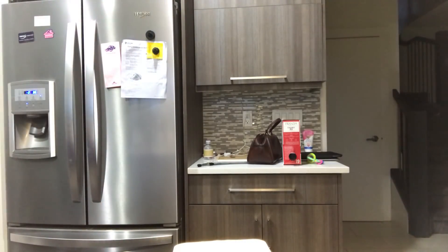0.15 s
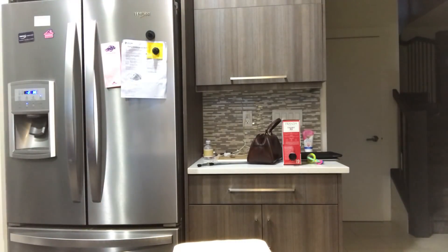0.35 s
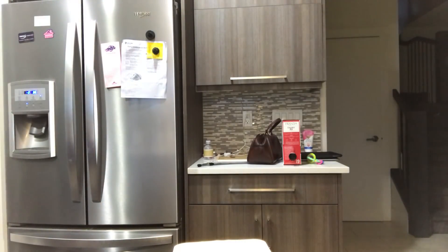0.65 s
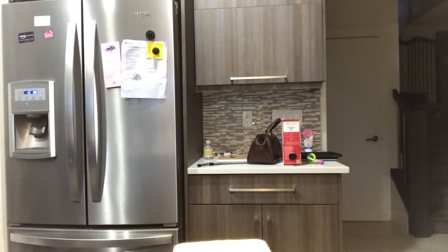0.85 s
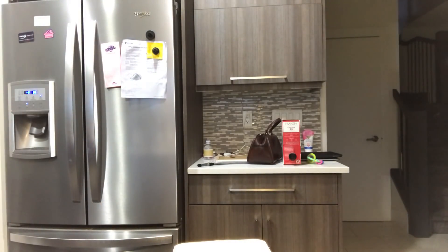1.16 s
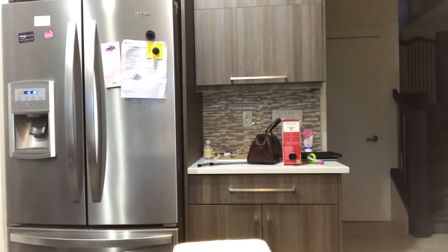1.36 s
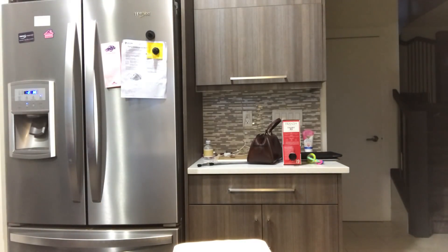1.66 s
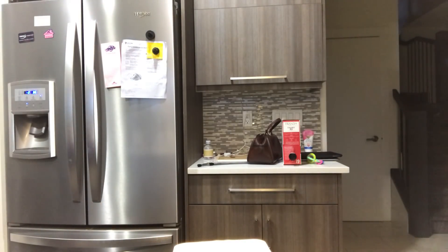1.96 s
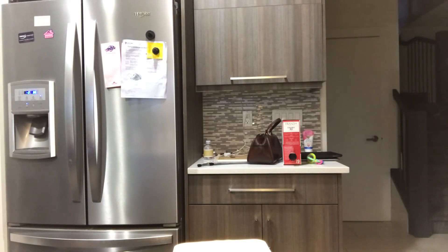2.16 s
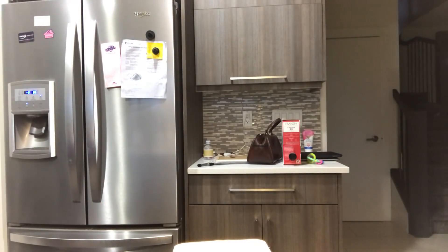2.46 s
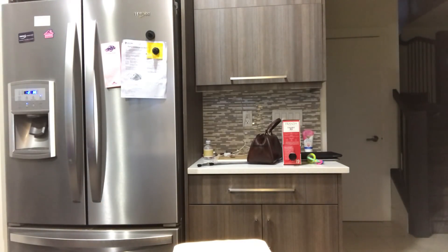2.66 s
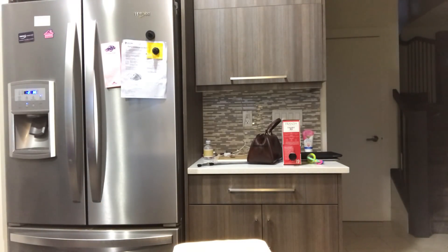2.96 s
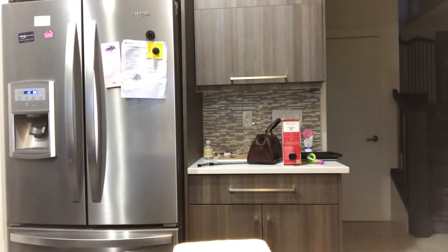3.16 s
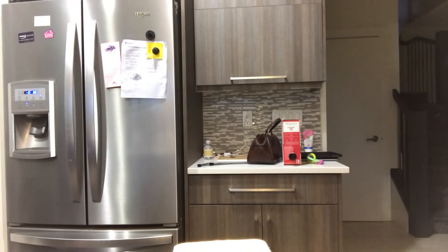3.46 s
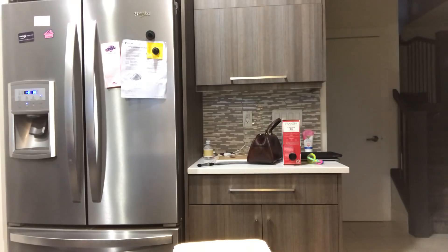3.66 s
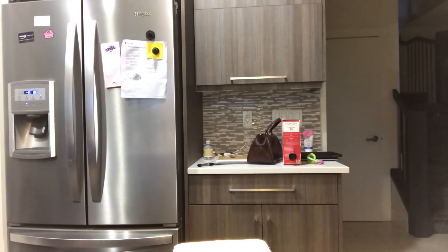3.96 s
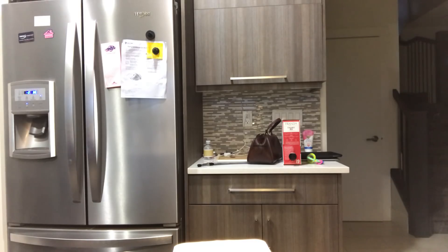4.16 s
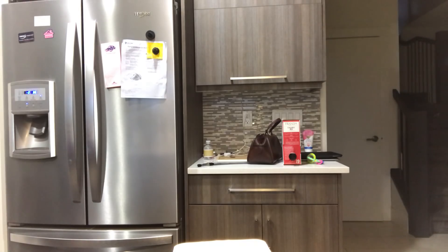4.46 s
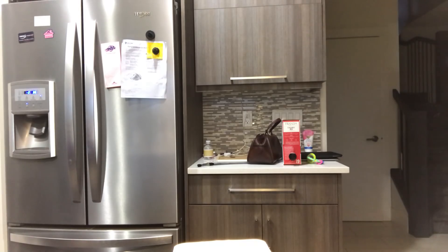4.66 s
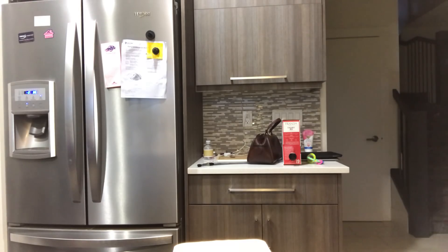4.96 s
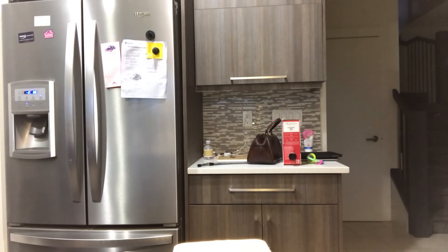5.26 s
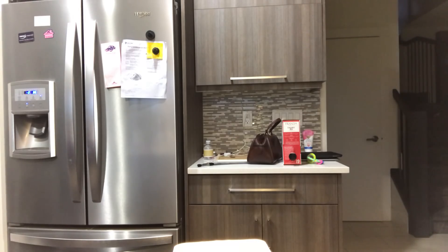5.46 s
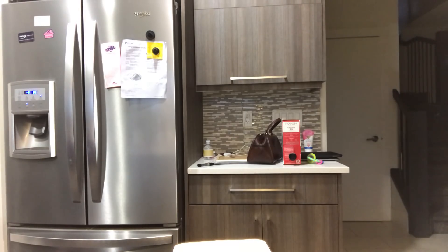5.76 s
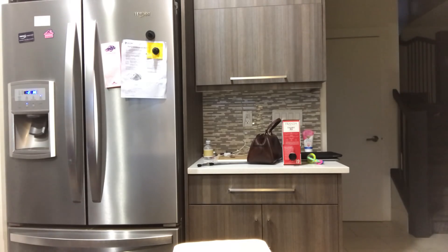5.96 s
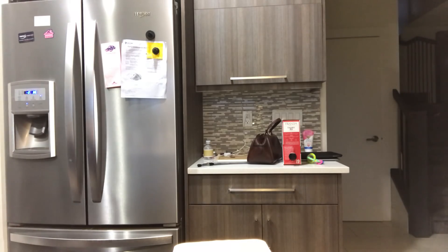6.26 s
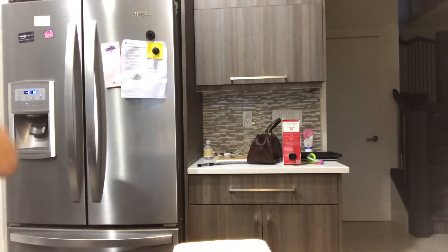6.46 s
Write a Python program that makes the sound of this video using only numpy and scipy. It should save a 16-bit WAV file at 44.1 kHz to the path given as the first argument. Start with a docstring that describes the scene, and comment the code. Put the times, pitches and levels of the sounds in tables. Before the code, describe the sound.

Small clicks and a low wooden rumble lead to a firm double-edged bump with a deep boom as a drawer reaches its stop. Spoons, forks and knives then tick and clack against each other and a hollow tray, growing busier and louder until pieces are dropped back. A softer roll and dull closing boom follow, with fabric rustling. Reverberant indoor kitchen, quiet fridge hum, single mono microphone.

```python
"""A drawer knocks and rumbles out to its stop, then steel cutlery clinks and jangles in a tray.
Each contact ticks, rings damped steel modes, clacks the handles and knocks the tray, all as struck resonators.
Rolls, fridge air and the clothes rustling at the end are shaped noise; the fridge hum is a few wavering sines.
Blows and slips sound through a hard-walled kitchen of early reflections and a diffuse tail."""
import sys
import numpy as np
from scipy import signal
from scipy.fft import rfft, irfft, next_fast_len
from scipy.io import wavfile
from scipy.ndimage import map_coordinates

SR = 44100
rng = np.random.default_rng(int(sys.argv[2]) if len(sys.argv) > 2 else 0)


def wav_out(sig):
    """Save sig, one row per channel (or a flat mono array), as 16-bit PCM at SR to the path in sys.argv[1]."""
    wavfile.write(sys.argv[1], SR, np.round(np.clip(np.atleast_2d(sig).T, -1, 1) * 32767).astype(np.int16))


N = 291746
TIME = np.arange(N) / SR
TAIL = np.arange(2 ** 15) / SR  # time axis in seconds of one struck sound with its decay
BRIEF = TAIL[:2 ** 12]  # time axis in seconds of the shortest details
TOP_HZ = 15950  # upper band limit

# Modes of a fork, rung singly and by pushed pieces.
# Each row: frequency in Hz before detuning, level in dB before scatter, t60 in seconds before damping.
FORK_MODES = [(4170, -6, .3), (4931, -7, .25), (5300, -6, .3), (6820, -7, .25), (7230, -7, .2),
              (7880, -6, .7), (7985, -9, .8), (9445, -2, .25), (9480, -6, .2), (11164, -7, .3),
              (11611, -1, .5), (11670, -4, .2), (12735, -3, .2), (13820, -1, .2), (14090, -5, .25),
              (14670, 0, .2), (15590, -2, .25)]
# Colours of the steel tick, the handle clack and the tray knock. Each row: frequency in Hz, level in dB.
TICK_COLOUR = [(500, -28), (2000, -9), (4000, 3.5), (5200, -1.5), (6200, 0), (7300, -0.5), (9500, 0.5),
               (10400, -8.5), (11500, -2), (14000, 0.5), (15700, 0)]
HANDLE_COLOUR = [(400, -24.5), (1000, -3.5), (1600, 1.5), (2500, 1.5), (2900, -3.5), (3500, -3),
                 (4300, -4.5), (5500, -8.5), (9000, -21.5), (15000, -33)]
TRAY_COLOUR = [(120, -27.5), (230, -3.5), (400, -6), (700, 0.5), (1250, 0.5), (1800, -7.5), (3000, -21),
               (7000, -37), (15000, -48)]
# Hollow resonances of tray and drawer. Each row: frequency in Hz, width in Hz, peak in dB over the colour.
BOX_RESONANCES = [(242, 16, 7), (358, 20, 3), (478, 30, 2), (589, 30, 2), (711, 28, 6), (1058, 35, 4),
                  (1245, 35, 4), (1470, 40, 3), (2310, 70, 2)]


def amp(db):
    """Decibels to gain."""
    return 10 ** (np.asarray(db) / 20)


def unit(x):
    """Scaled to rms 1."""
    return x / np.sqrt(np.mean(x ** 2) + 1e-20)


def along(points, hz):
    """(Hz, value) points read on a log frequency axis."""
    f, v = np.transpose(points)
    return np.interp(np.log(hz + 1), np.log(f + 1), v)


def swell(strokes, attack_s, release_s):
    """Gain per sample of (start s, length s, dB) strokes: each sets in, holds and dies away."""
    gain = np.zeros(N)
    for start, length, db in strokes:
        t = TIME - start
        attack = np.clip(t / attack_s, 0, 1)
        release = np.exp(-np.maximum(t - length, 0) / release_s)
        gain += amp(db) * attack * release
    return gain


def add(bus, s, x):
    """Mix x into the bus at time s in seconds."""
    part = bus[max(round(s * SR), 0):][:len(x)]
    part += x[:len(part)]


def through(x, response):
    """x played through an impulse response, at its own length."""
    return signal.fftconvolve(x, response)[:len(x)]


def body(colour, resonances=(), size=8192):
    """Minimum-phase impulse response of energy 1 with a broad colour and resonant peaks."""
    hz = np.fft.rfftfreq(size, 1 / SR)
    db = along(colour, hz)
    for f, width, peak in resonances:
        db = db + peak / (1 + (2 * (hz - f) / width) ** 2)
    # folding the cepstrum forward in time makes the response causal
    cepstrum = irfft(np.log(amp(db)))
    cepstrum[1:size // 2] *= 2
    cepstrum[size // 2 + 1:] = 0
    response = irfft(np.exp(rfft(cepstrum)))
    return response / np.linalg.norm(response)


def noise(colour):
    """Coloured noise of rms 1."""
    return unit(through(rng.standard_normal(N), body(colour)))


def kitchen(direct_db=-8, early_db=-2, early_s=0.0079, build_s=0.0042):
    """The room's answer, drawn anew per call: direct sound, a cluster off counter and cupboards, a diffuse tail."""
    # Reverberation time of the tail. Each row: frequency in Hz, t60 in seconds.
    decay_times = [(100, 0.79), (400, 0.56), (1200, 0.72), (4000, 0.65), (8000, 0.55), (15000, 0.39)]
    hz, t, z = signal.stft(rng.standard_normal(len(TAIL)), SR, nperseg=256)
    decay = amp(-60 * t / along(decay_times, hz)[:, None])
    tail = signal.istft(z * decay, SR, nperseg=256)[1][:len(TAIL)]
    tail *= 1 - np.exp(-TAIL / build_s)
    early = rng.standard_normal(len(TAIL)) * np.exp(-((TAIL - early_s) / .004) ** 2)
    response = tail / np.linalg.norm(tail)
    response += amp(early_db) * early / np.linalg.norm(early)
    response[0] += amp(direct_db)
    return response


def chatter(length_s, bounce_db, per_s=900):
    """A first blow and its quick, random, dying bounces, of energy 1."""
    blows = (rng.random(len(BRIEF)) < per_s / SR) * rng.standard_normal(len(BRIEF))
    blows *= amp(bounce_db) * np.exp(-BRIEF / max(length_s, 1e-3))
    blows[0] = 1
    return blows / np.linalg.norm(blows)


def strike(response, length_s, bounce_db):
    """A chattering blow on a body, padded to the length of TAIL."""
    sound = signal.fftconvolve(chatter(length_s, bounce_db), response)
    return np.pad(sound, (0, len(TAIL) - len(sound)))


def bounces(first, step, count):
    """Rows of a blow and its repeats, each one step on from the last."""
    return [np.add(first, k * np.array(step)) for k in range(count)]


def ring(modes, detune=0.0039, damping=0.17, scatter_db=5.5, count=3, size=128):
    """Damped sines of like pieces of steel, each a little out of tune and its t60 scaled by damping; energy 1."""
    hz, db, t60 = np.tile(np.transpose(modes), count)
    hz = hz * (1 + detune * rng.standard_normal(len(hz)))
    level = amp(db + scatter_db * rng.standard_normal(len(hz)))
    strength = level * np.exp(2j * np.pi * rng.random(len(hz)))
    poles = 2j * np.pi * hz - np.log(1000) / (t60 * damping)
    # each damped sine: its state at the start of a block times its course within the block
    block_starts = strength * np.exp(np.outer(TAIL[::size], poles))
    within_block = np.exp(np.outer(poles, TAIL[:size]))
    tone = (block_starts @ within_block).imag.ravel()
    return tone / np.linalg.norm(tone)


def heap(t60, lo_hz, hi_hz, count=16):
    """The other pieces, lying on each other, answer every blow with different brief modes; energy 1."""
    hz = rng.uniform(lo_hz, hi_hz, (count, 1))
    modes = np.sin(2 * np.pi * (hz * BRIEF + rng.random((count, 1))))
    tone = modes.sum(axis=0) * amp(-60 * BRIEF / t60)
    return tone / np.linalg.norm(tone)


def background(air_db=-61.5, hum_db=-1, waver=0.21, waver_rate=6):
    """The fridge's hum, sines with slowly drifting phase, over the quiet rush of the room."""
    # Colour of the room's rush. Each row: frequency in Hz, level in dB.
    air_colour = [(12, -52), (20, -28), (48, -7), (134, -0.5), (158, -3), (241, -4), (262, -2.5),
                  (285, -3.5), (319, -5), (347, -2), (377, -9.5), (607, -8.5), (1330, -20), (4420, -26),
                  (16000, -38)]
    # Partials of the fridge. Each row: frequency in Hz, rms level in dB before the hum trim.
    hum_partials = [(59.2, -66), (188.4, -70), (236.9, -67), (296.1, -70.5), (398.4, -70.5)]
    out = amp(air_db) * noise(air_colour)
    for hz, db in hum_partials:
        drift = map_coordinates(rng.standard_normal(200), [TIME * waver_rate], mode="mirror")
        out += amp(db + hum_db) * unit(np.sin(2 * np.pi * hz * TIME + waver * drift))
    return out


def clothes(level_db=-1):
    """Soft swishes of fabric: coloured noise that swells and dies away."""
    # Swishes of clothing. Each row: start in seconds, length in seconds before the release, level in dB before trim.
    swishes = [(6.11, .07, -66), (6.185, 0.055, -60.5), (6.485, 0.058, -55)]
    # Colour of the fabric. Each row: frequency in Hz, level in dB.
    cloth_colour = [(600, -16.5), (1800, -1), (2700, -2), (3250, 2.5), (4200, -4), (6500, -2),
                    (10000, -13.5), (15000, -12)]
    return amp(level_db) * swell(swishes, attack_s=0.053, release_s=0.13) * noise(cloth_colour)


def drawer(click_db=30, rail_db=15, wood_db=30, roll_db=-1):
    """The drawer rumbles along its runners and bumps its stop; clicks, ringing rails and wood boom on each blow."""
    # The drawer runs out, then back. Each row: start in seconds, length in seconds before the release,
    # level in dB before trim.
    rolls = [(.5, 0.5, -56), (5.5, 0.67, -62)]
    # Light knocks as the drawer is gripped and runs. Each row: start in seconds, runner click in dB,
    # wood in dB, extra rail ring in dB, all levels before trim.
    bumps = [(0.043, -56.5, -64, 8.5), (0.089, -53.5, -56.5, 8), (0.173, -60, -61.5, -13),
             (0.465, -51.5, -56.5, -8), (0.712, -64, -58, 0), (1.103, -63, -53.5, 2), (1.386, -52, -52, 0),
             (1.785, -61.5, -60, -9)]
    # The blow at the stop, in one row: runner click in dB, wood in dB, extra rail ring in dB, before trim.
    stop_levels = (-35.5, -34.5, 3)
    # Booms of the woodwork: the front when pulled, the cabinet at the stop and on closing.
    # Each row: start in seconds, frequency in Hz, level in dB before rise and decay, t60 in seconds,
    # rise time constant in seconds.
    shudders = [(.09, 349, -43, 0.18, 0.0019), (0.092, 510, -49.5, 0.28, 0.0035),
                (1.41, 37, -34.5, 0.5, 0.038), (1.406, 95.5, -41.5, 0.48, 0.033),
                (1.407, 127.3, -40, 0.097, 0.013), (1.407, 240, -37, 0.28, 0.016),
                (6.1, 143.5, -50, 0.37, 0.029)]
    # A gentle blow is a soft, dull one. Each row: runner click in dB before trim, low-pass edge in Hz
    # before the cap at TOP_HZ.
    hardness = [(-38, 5200), (-35, 20000)]
    # Modes of the steel runners. Each row: frequency in Hz before detuning, level in dB before scatter,
    # t60 in seconds before damping.
    rail_modes = [(3536, -7, 1.5), (4010, -7, .2), (4290, -5, .2), (4700, -6, .15), (4990, -7, .2),
                  (5560, -15, 1.2), (5819, -6, .2), (6637, -6, .2), (7778, -7, .2), (8720, -9, .2),
                  (11574, -10, .2), (15423, -13, .2)]
    # Colours of the rolling, the runner click and the wood. Each row: frequency in Hz, level in dB.
    rumble_colour = [(88, -31), (150, -7.5), (299, -4.5), (651, -8), (710, -7.5), (1660, -21),
                     (2010, -27.5), (5000, -38.5), (6500, -64.5), (11000, -120)]
    runner_colour = [(400, -23.5), (1500, 8), (2400, 8.5), (4200, 4.5), (5300, 2), (6800, 3), (10400, -5.5),
                     (11600, -1), (15500, -2)]
    wood_colour = [(50, -22), (130, 1), (240, 4), (500, 8.5), (1000, 4), (2000, 0.5), (2800, -8),
                   (5000, -37), (15000, -60)]

    out = amp(roll_db) * swell(rolls, attack_s=0.11, release_s=0.16) * noise(rumble_colour)
    runner, wood = body(runner_colour), body(wood_colour, BOX_RESONANCES)
    # against its stop the drawer rebounds: seconds on, click and wood lower in dB, same extra ring
    stop_s, rebound = 1.395, (.021, -4, -3, 0)
    for s, click, thud, free in [*bumps, *bounces((stop_s, *stop_levels), rebound, count=3)]:
        blow = amp(click + click_db) * strike(runner, 0.0037, bounce_db=-4.5)
        blow += amp(click + rail_db + free) * ring(rail_modes, detune=0.0012, damping=0.82, count=1)
        blow += amp(thud + wood_db) * strike(wood, 0.0041, bounce_db=4)
        edge_hz = min(np.interp(click, *np.transpose(hardness)), TOP_HZ)
        softened = signal.lfilter(*signal.butter(1, edge_hz, fs=SR), blow)
        add(out, s, through(softened, kitchen()))
    for s, hz, db, t60, rise_s in shudders:
        envelope = amp(db - 60 * TAIL / t60) * (1 - np.exp(-TAIL / rise_s))
        add(out, s, envelope * np.sin(2 * np.pi * hz * TAIL))
    return out


def jostle(tray_db=-15, handle_db=-13, steel_db=-14, ring_db=-21, per_s=140):
    """Pushed pieces slip over each other in many small random contacts, each exciting steel, handle and tray."""
    # The hand pushes through the heap. Each row: start in seconds, length in seconds before the release,
    # level in dB of the slips before the contact levels.
    pushes = [(3.89, 0.24, -35.5), (4.36, .25, -32.5)]
    effort = swell(pushes, attack_s=0.025, release_s=0.031)
    slips = unit((rng.random(N) < per_s / SR) * rng.standard_normal(N)) * effort
    contact = amp(ring_db) * ring(FORK_MODES)
    knock = amp(tray_db) * body(TRAY_COLOUR, BOX_RESONANCES)
    knock += amp(handle_db) * body(HANDLE_COLOUR)
    knock += amp(steel_db) * body(TICK_COLOUR)
    add(contact, 0, knock)
    return through(slips, through(kitchen(), contact))


def cutlery(tick_db=30, heap_db=24, ring_db=23, clack_db=28, handle_ring_db=18, knock_db=30, tray_lag_s=0.00305):
    """Steel meets steel and rings, the handles clack, and a moment later the tray takes the blow."""
    # Cutlery picked up and knocked about. Each row: start in seconds, steel tick in dB, handle clack in dB,
    # tray knock in dB, extra ring in dB, all levels before trim.
    clinks = [(2.246, -78, -63, -54.5, -10), (2.290, -76, -58.5, -54.5, 0), (2.349, -60, -55.5, -70, -10),
              (2.571, -52, -55.5, -56.5, -9), (2.635, -46, -50.5, -47.5, -1), (2.668, -49.5, -48, -53, -3),
              (2.694, -56, -53.5, -49.5, 9), (2.763, -47.5, -40.5, -52, 11), (2.899, -74, -39, -38.5, -8),
              (2.963, -77, -62, -54, -3), (3.618, -73, -59, -57, -1), (3.646, -53, -53.5, -54.5, -10),
              (3.662, -53.5, -44, -54, -13), (3.702, -50.5, -48, -52, -15), (3.786, -49, -42.5, -46, 14),
              (3.881, -37.5, -43.5, -42, -0.5), (3.943, -49.5, -36, -43, -8), (3.998, -42, -40, -40.5, -8),
              (4.049, -43.5, -35.5, -39, -9), (4.099, -44.5, -32, -43, -17),
              (4.191, -46.5, -50, -44.5, -12), (4.266, -51, -56, -54, -3), (4.326, -45.5, -43.5, -47, -8),
              (4.341, -38.5, -38, -40, 3), (4.454, -35, -37, -38.5, -1), (4.513, -50, -36, -38, 3),
              (4.903, -39.5, -44.5, -43.5, 2.5), (5.206, -81, -59, -54, 0)]
    # Handfuls dropped back into the tray, each tumbling a few times before it lies still.
    # Each row: start in seconds, steel tick in dB, handle clack in dB, tray knock in dB, extra ring in dB.
    drops = [(4.597, -36.5, -39, -40.5, 10.3), (5.224, -30, -36.5, -35, 3)]
    # A piece landing on its handle stops dead, steel on steel chatters.
    # Each row: steel tick over handle clack in dB before trim, time constant of the chatter in seconds.
    chatter_lengths = [(-13, 0.0028), (3, 0.0086)]
    # Modes of a spoon and a knife. Each row: frequency in Hz before detuning, level in dB before scatter,
    # t60 in seconds before damping.
    spoon_modes = [(1060, -3, .15), (2314, -5, .15), (2500, -6, .15), (3480, -7, .2), (4000, -7, .35),
                   (5291, -6, .25), (7009, -1, .45), (9140, -7, 1.2), (9496, -7, .3), (11595, -3, .25),
                   (12763, 0, .25), (13813, -5, .35), (14730, 0, .2), (14950, -3, .2), (15595, -3, .35)]
    knife_modes = [(2306, -4, .4), (3950, -3, .3), (4376, -5, .5), (5040, -5, .35), (5280, -5, .35),
                   (7440, -5, .4), (7902, -3, .3), (9108, -4, .3), (9463, -6, .3), (11470, -1, .3),
                   (11600, -3, .3), (12473, 0, .2), (13339, -3, .3), (13860, -3, .25), (14120, 0, .4),
                   (15557, -3, .3)]
    # Times at which the next piece takes over the ringing, in seconds: spoon to fork, fork to knife.
    next_piece = [3.3, 4.8]

    out = np.zeros(N)
    steel, handles, tray = body(TICK_COLOUR), body(HANDLE_COLOUR), body(TRAY_COLOUR, BOX_RESONANCES)
    pieces = [spoon_modes, FORK_MODES, knife_modes]
    # each tumble: seconds on, then tick, clack and knock lower in dB, same extra ring
    tumble = (.0205, -6, -2.5, -2.15, 0)
    falls = [row for drop in drops for row in bounces(drop, tumble, count=4)]
    for s, tick, clack, knock, free in [*clinks, *falls]:
        chatter_s = np.interp(tick - clack, *np.transpose(chatter_lengths))
        hit = amp(tick + tick_db) * strike(steel, chatter_s, bounce_db=6.0)
        hit += amp(tick + ring_db + free) * ring(pieces[np.searchsorted(next_piece, s)])
        hit += amp(clack + clack_db) * strike(handles, chatter_s, bounce_db=1.5)
        steel_heap = through(heap(t60=0.024, lo_hz=4096, hi_hz=15470), steel)
        add(hit, 0, amp(tick + heap_db) * steel_heap)
        handle_heap = through(heap(t60=0.025, lo_hz=820, hi_hz=3818, count=12), handles)
        add(hit, 0, amp(clack + handle_ring_db) * handle_heap)
        add(hit, tray_lag_s, amp(knock + knock_db) * strike(tray, chatter_s, bounce_db=1))
        add(out, s, through(hit, kitchen()))
    return out


def scene():
    """One microphone feeds both channels."""
    mono = background() + clothes() + drawer() + jostle() + cutlery()
    return np.array([mono, mono])


def record(dry):
    """A band limit: the treble fades out over the last 350 Hz below TOP_HZ."""
    size = next_fast_len(N + SR)
    passband = np.clip((TOP_HZ - np.fft.rfftfreq(size, 1 / SR)) / 350, 0, 1) ** 2
    return irfft(rfft(dry, size) * passband, size)[:, :N]


dry = scene()
out = record(dry)
wav_out(out)
```